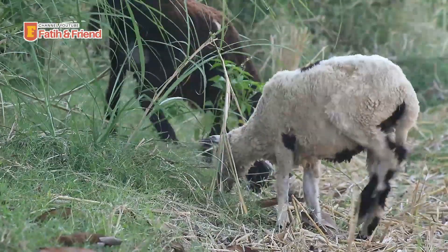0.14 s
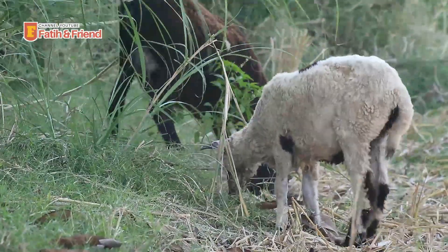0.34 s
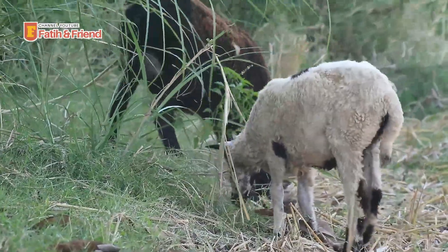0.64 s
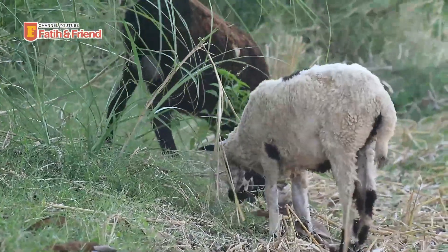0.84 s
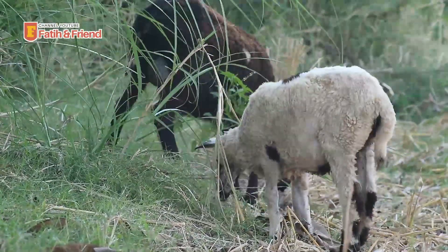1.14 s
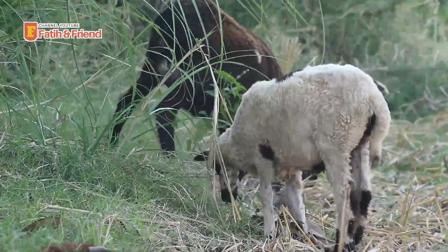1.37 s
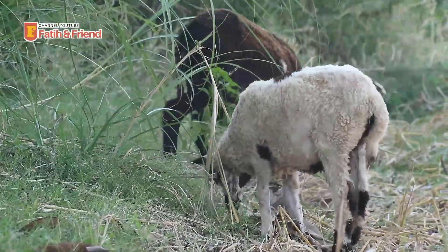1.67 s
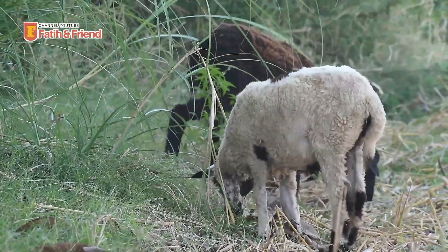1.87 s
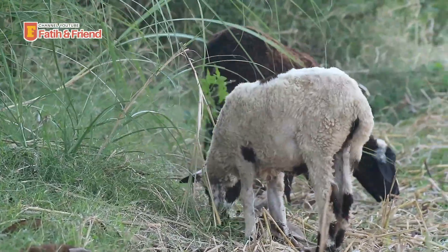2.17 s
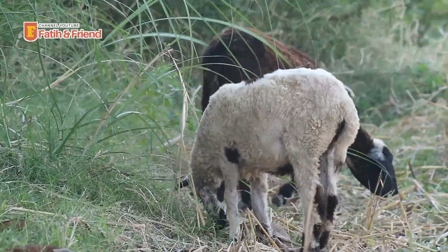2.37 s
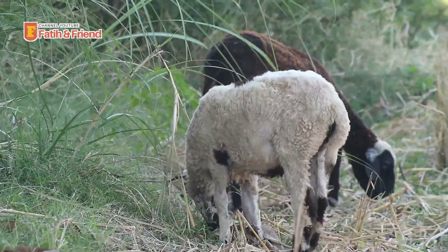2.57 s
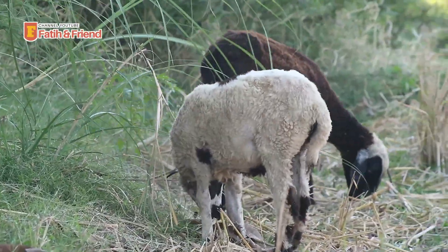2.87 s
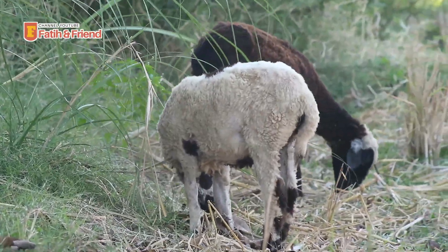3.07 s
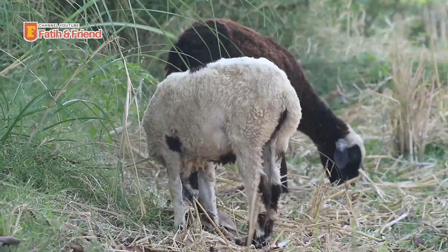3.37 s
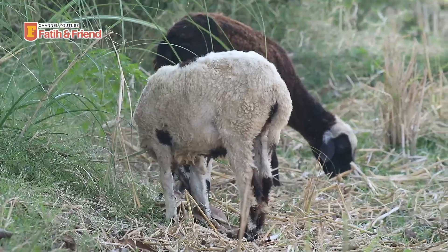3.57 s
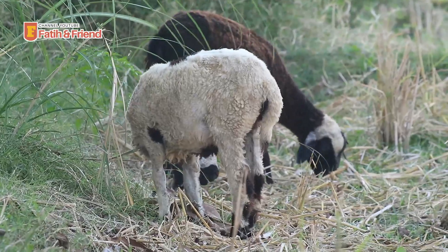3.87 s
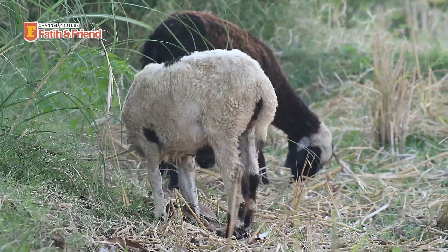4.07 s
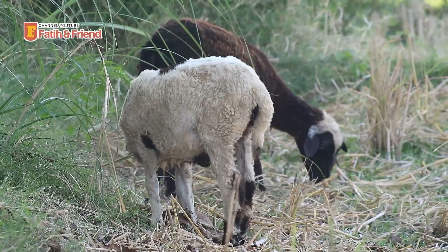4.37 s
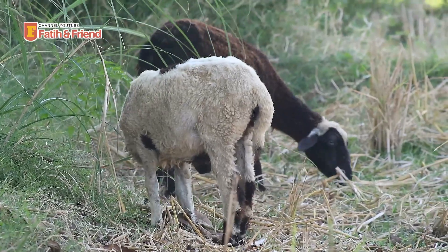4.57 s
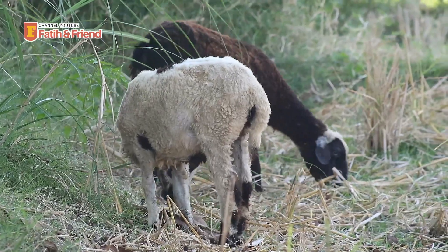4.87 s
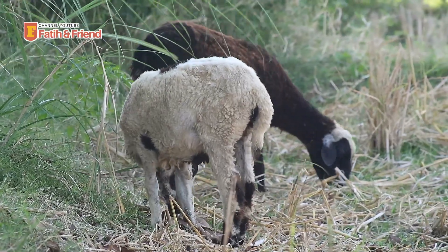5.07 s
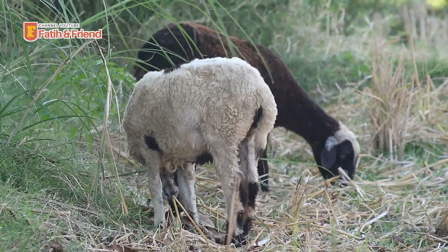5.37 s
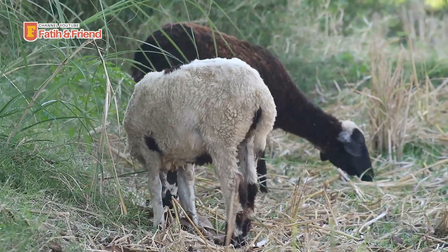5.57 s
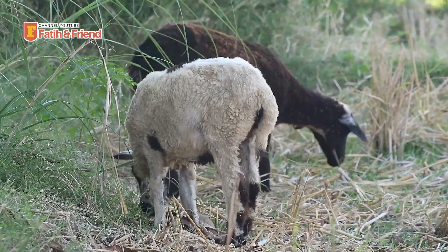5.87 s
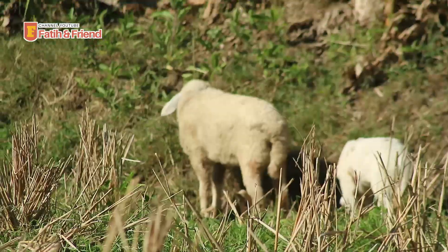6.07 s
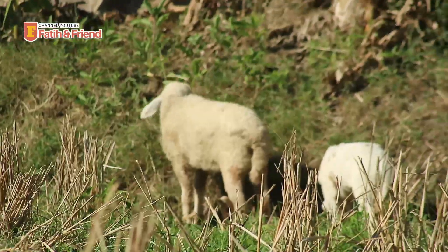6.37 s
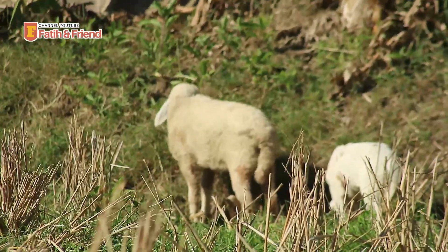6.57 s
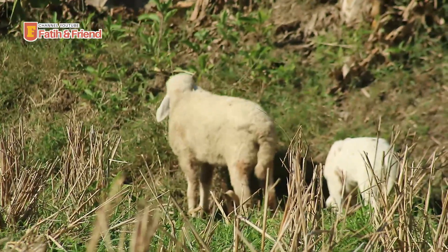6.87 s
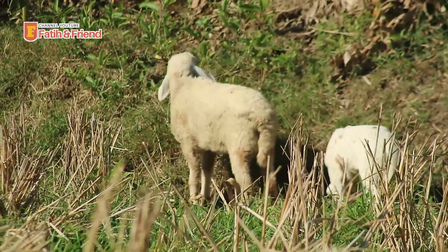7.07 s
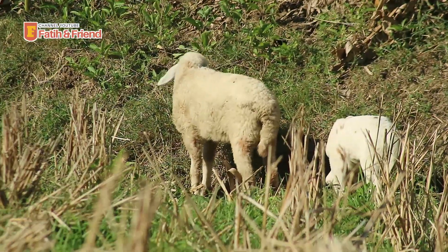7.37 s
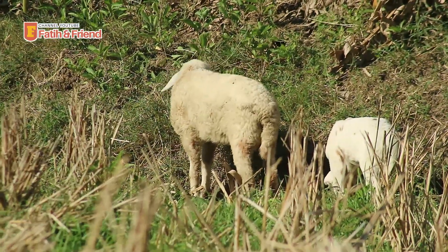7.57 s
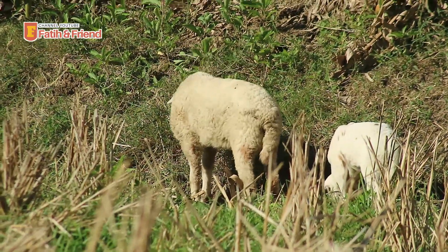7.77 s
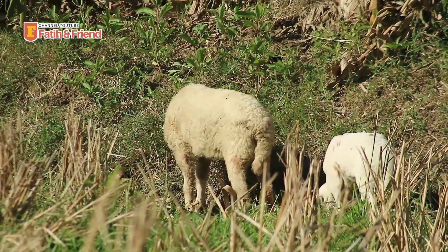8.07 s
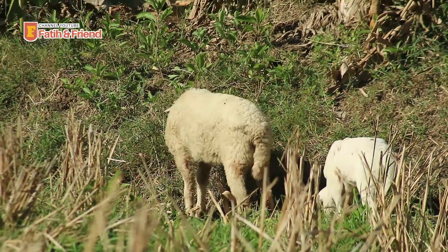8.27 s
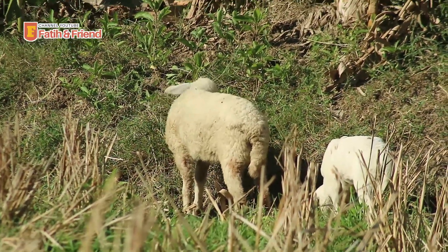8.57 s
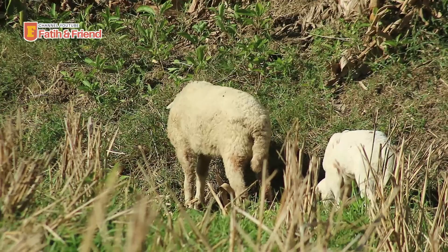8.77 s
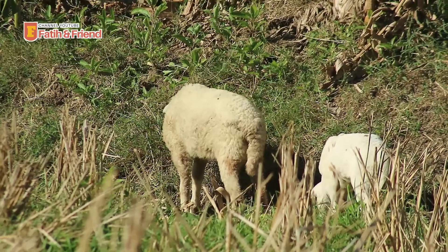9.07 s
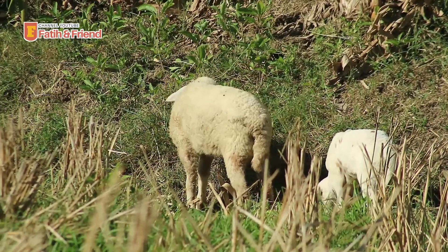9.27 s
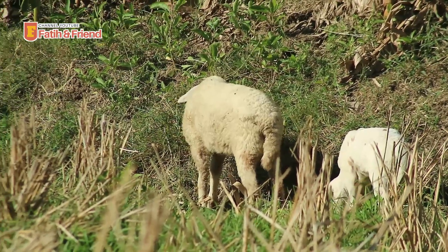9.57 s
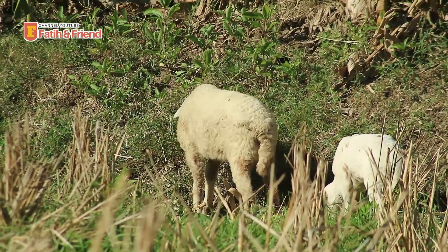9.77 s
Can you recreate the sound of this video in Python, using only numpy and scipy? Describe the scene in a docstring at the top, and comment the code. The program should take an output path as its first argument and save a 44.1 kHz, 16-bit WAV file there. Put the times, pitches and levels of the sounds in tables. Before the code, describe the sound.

Outdoor flock of lambs, mono and band-limited, with slight gritty hiss under each call. High nasal bleats scoop up, hold, then sag and tremble; they overlap at first, then a deep call and a raspy, strong one stand alone. The sound drops out briefly with clicks, two softer bleats overlap, another follows, and a final call begins.

```python
"""Lambs in an open field. Slow fold beats creak, then four arching bleats overlap in a run, each a train of
vocal-fold pulses and pulsed air, ragged at low pitch, clear at the top, coloured by a throat and mouth.
A deep bleat and the loudest follow; in the pause a coarse recorder mutes and returns with clicks. Then an
overlapping pair, a closing bleat, and the opening bleat again, cut off by the end. A ground bounce and a
short, dull scatter follow every call; the recorder's coarse steps add a faint hiss."""
import sys
import numpy as np
from scipy import signal
from scipy.fft import rfft, irfft, next_fast_len
from scipy.io import wavfile
from scipy.ndimage import uniform_filter1d

SR = 44100
rng = np.random.default_rng(int(sys.argv[2]) if len(sys.argv) > 2 else 0)


def file_out(sig):
    """Save sig as 16-bit WAV at sys.argv[1]."""
    # one column per channel
    cols = np.atleast_2d(sig).T
    # limit, then scale
    lim = np.clip(cols, -1, 1)
    pcm = np.round(lim * 32767).astype(np.int16)
    wavfile.write(sys.argv[1], SR, pcm)


N = 437913

# throat and mouth resonances per voice: f/Hz, level/dB
BRIGHT_THROAT = [(270, -23), (520, -17), (800, -9.5), (1100, -15), (1350, -13), (1600, -21), (2100, -9.5),
                 (2500, -22), (3000, -4), (3450, -9), (4100, -27), (4700, -26.5), (5600, -48), (7000, -35),
                 (9000, -84)]
# f/Hz, level/dB
STRONG_THROAT = [(280, -25), (600, -21), (880, -6), (1200, -21.5), (1500, -17), (1780, -2.5), (2100, -15),
                 (2500, -2), (3000, -16), (3600, -27.5), (4300, -26), (5300, -54), (6400, -45), (9000, -75)]
# f/Hz, level/dB
THIN_THROAT = [(260, -20.5), (520, -14), (800, -6), (1050, 5), (1400, -15), (1800, -18.5), (2200, -10),
               (2900, -7.5), (3400, -19.5), (4400, -26), (5500, -55), (9000, -71.5)]
# f/Hz, level/dB
HOLLOW_THROAT = [(260, -32.5), (520, -12.5), (760, -18.5), (1020, 0.5), (1300, -12.5), (1600, -16.5),
                 (2080, 2), (2450, -19), (3000, 1.5), (3500, -6.5), (3900, -24.5), (4500, -29), (5600, -45),
                 (9000, -72)]
# f/Hz, level/dB
DEEP_THROAT = [(180, -21), (380, -18), (730, -8), (920, 3.5), (1130, -15), (1550, -9), (1900, 3.5),
               (2100, -14), (2800, -7), (3500, -4), (4200, -26), (5000, -29.5), (6000, -47), (9000, -69.5)]
# f/Hz, level/dB
REEDY_THROAT = [(230, -29), (450, -14), (680, -6.5), (870, 2.5), (1200, -15), (1600, -11.5), (1950, 0),
                (2300, -7), (2900, -1.5), (3600, -6), (4400, -21.5), (5000, -31.5), (6500, -47),
                (9000, -69)]
# f/Hz, level/dB
NASAL_THROAT = [(230, -29), (470, -16.5), (700, -17.5), (930, -3), (1200, -18), (1600, -16.5), (1900, 0),
                (2350, -21), (2900, 0.5), (3300, -8), (3800, -21), (4900, -31), (6200, -54.5), (9000, -70)]
# throat behind a shut mouth: f/Hz, level/dB
SHUT_MOUTH = [(300, -9), (700, -3), (1300, 0), (2000, -8), (3000, -5), (4500, -11), (7000, -35)]
REPEAT_S = 9.0998


def flock():
    """Sum of all calls and creaks; the opening call returns after REPEAT_S."""
    calls = np.zeros(N)
    for delay_s in (0, REPEAT_S):
        calls += creak("opening", SHUT_MOUTH, delay_s)
        calls += bleat("opening", BRIGHT_THROAT, rough=.0018, rasp_db=-28, quaver=.0012, tremble=.004,
                       hum_db=5.5, closed=.019, release_s=.016, delay_s=delay_s)
    calls += bleat("answer", STRONG_THROAT, rough=.0026, rasp_db=-25, quaver=.0025, tremble=.005,
                   hum_db=17, closed=.0088, release_s=.011, squeeze_db=6)
    calls += bleat("joining", THIN_THROAT, rough=.0017, rasp_db=-19.5, quaver=.0055, tremble=.008,
                   hum_db=1, closed=.017, release_s=.007)
    calls += bleat("hollow", HOLLOW_THROAT, rough=.0033, rasp_db=-20, quaver=.007, tremble=.011,
                   hum_db=9, closed=.013, release_s=.018)
    calls += creak("deep", DEEP_THROAT)
    calls += bleat("deep", DEEP_THROAT, rough=.0019, rasp_db=-24, quaver=.0018, tremble=.003,
                   hum_db=1, closed=.009, release_s=.014)
    calls += creak("loudest", STRONG_THROAT)
    calls += bleat("loudest", STRONG_THROAT, rough=.0021, rasp_db=-27, quaver=.0025, tremble=.008,
                   hum_db=22.5, closed=.0075, release_s=.011, squeeze_db=9)
    calls += bleat("pair, first", REEDY_THROAT, rough=.0018, rasp_db=-21, quaver=.0035, tremble=.006,
                   hum_db=-3, closed=-.14, release_s=.015)
    calls += bleat("pair, second", REEDY_THROAT, rough=.0016, rasp_db=-27, quaver=.0045, tremble=.005,
                   hum_db=5, closed=.016, release_s=.018)
    calls += creak("closing", NASAL_THROAT)
    calls += bleat("closing", NASAL_THROAT, rough=.0016, rasp_db=-27, quaver=.0022, tremble=.004,
                   hum_db=-3.5, closed=.03, release_s=.009, squeeze_db=4)
    return calls


# one row per bleat: t/s, length/s, nominal top f/Hz, scoop/share, rise/s, sag/share, drop/share,
# nominal crest level/dB, crest after/s, swell/dB, fade/dB, brightness/dB, dulling/dB
BLEATS = {"opening": (.486, .924, 278.3, .222, .163, 0.15, 0.027, -23, .33, 10.5, 5.5, 6.5, 1),
          "answer": (1.19, 1.32, 299.1, .52, 0.152, 0.054, 0.08, -21.5, .25, 12, 8.5, 8, 6),
          "joining": (1.825, 1.092, 266.4, 0.19, 0.1, 0.094, 0.12, -25.8, .3, 3, 6.5, 13.5, 5),
          "hollow": (2.4, .92, 267.6, .366, .141, .078, 0.026, -30, .24, 3, 2, -4, 0),
          "deep": (3.578, .892, 190.7, .18, .19, 0.13, 0.048, -29, 0.41, 2.5, 3.5, 1, 3),
          "loudest": (4.48, 1.386, 303.5, 0.35, 0.14, 0.115, .03, -18, .46, 2, 16, 8.5, 13.5),
          "pair, first": (6.63, 1.02, 257.5, .275, .135, .232, 0.035, -33.5, .27, 7, 9.5, -.5, 4),
          "pair, second": (6.76, .9, 233, 0.26, 0.2, 0.09, .05, -30.5, 0.49, 7, 8, 7, 4),
          "closing": (7.762, 1.07, 242.5, .27, .115, .115, .15, -25, 0.44, 6, 4, 5.5, 0)}
SPLIT_HZ, EDGE_HZ, HUM_HZ = 1400, 3700, 350
RASP_JITTER, RASP_AIR_DB = .01, 9  # at harshness 1: period scatter share, extra air


def bleat(name, throat, rough, rasp_db, quaver, tremble, hum_db, closed, release_s, squeeze_db=0, delay_s=0):
    """One call: fold pulses and pulsed air ring a throat whose resonances shift at the onset."""
    row = BLEATS[name]
    start, length = row[:2]
    end = start + length
    first = int((start - .02 + delay_s) * SR)
    t = np.arange(first, (end + .15 + delay_s) * SR) / SR - delay_s
    n = len(t)
    hz, level_db, bright_db = gesture(name, row, t, tremble)
    after, before, age = np.maximum(t - end, 0), np.maximum(start - t, 0), t - t[0]

    hz = hz * np.exp(-3.5 * after)  # folds slacken as the air runs out
    slack = np.clip(1 - hz / hz.max(), 0, .3)
    harsh = harshness(name, t)
    ragged = rough * (1 + 8 * slack) + RASP_JITTER * harsh  # slack folds beat unevenly
    hz = hz * (1 + quaver * walk(n, 24) + ragged * walk(n, 420))
    phase = np.cumsum(hz) / SR % 1
    offset = (phase - .5) * SR / hz  # samples from the nearest closure
    pulses = np.sinc(offset / 2) * np.exp(-(offset / 10) ** 2)
    pulses = unit(pulses - uniform_filter1d(pulses, size=900))
    pulses *= undb(27 * ragged * walk(n, 300))

    puff = .37 + np.exp(-((phase - .5) % 1) / .2)  # air peaks at each closure
    air = unit(rng.standard_normal(n) * puff)
    stop_db = squeeze_db * np.exp(-((t - end + .028) / .031) ** 2)  # throat squeezes shut with a rasp
    air_db = rasp_db + 20 * slack + stop_db / 2 + RASP_AIR_DB * harsh
    source = pulses + undb(air_db) * air

    # a slower throat clock lowers all resonances; negative closed raises them
    tongue = .016 * walk(n, 10)  # small shifts of tongue and jaw
    clock = np.cumsum(1 - closed * np.exp(-age / .18) + tongue)
    ticks = np.arange(n)
    ringing = colour(np.interp(ticks, clock, source), throat)
    voice = np.interp(clock, ticks, ringing)

    body, upper = split(steady(voice), SPLIT_HZ)
    hum, vowel = split(body, HUM_HZ)
    middle, edge = split(upper, EDGE_HZ)
    nose_db = hum_db * (np.exp(-(age / .6) ** 2) - .5)  # from +hum_db/2 towards -hum_db/2
    effort_db = np.maximum(level_db - level_db.max(), -11)  # effort sharpens the edge
    edge_db = 5.5 + .7 * effort_db + 20 * slack + stop_db
    voice = (hum * undb(nose_db) + vowel) * undb(-bright_db) + middle + edge * undb(edge_db)
    voice *= undb(level_db + .5 * walk(n, 30))
    voice *= np.exp(-before / .004 - after / release_s)
    return np.pad(flare(name, t, voice), (first, N))[:N]


# voice breaks into a deep warble: bleat, t/s, length/s, pitch swing/share
WARBLES = [("pair, second", 7.22, .2, .025), ("closing", 8.603, .15, .009)]
WARBLE_HZ = 13.7
TREMBLE_HZ, TREMBLE_WANDER, TREMBLE_DB = 12, .25, .7  # mean rate, its spread as a share, swing at the end


def gesture(name, row, t, tremble):
    """Pitch, level, brightness: arch and push, lurches, warbles and a shake that grows as the lamb tires."""
    start, length, *shape = row
    age = np.clip(t - start, 0, length)
    level_db, bright_db = push(age, length, *shape[5:])
    pitch_step, level_step_db, bright_step_db = lurches(name, t)
    tremble_hz = TREMBLE_HZ * (1 + TREMBLE_WANDER * walk(len(t), 10))
    shake = age / length * np.sin(2 * np.pi * np.cumsum(tremble_hz) / SR)
    warble = np.zeros(len(t))
    for who, s, span, depth in WARBLES:
        if who == name:
            warble += depth * hold(t, s, span) * np.sin(2 * np.pi * WARBLE_HZ * (t - s))
    hz = arch(age, length, *shape[:5]) * (1 + pitch_step + warble + tremble * shake)
    return hz, level_db + level_step_db + TREMBLE_DB * shake, bright_db + bright_step_db


SCOOP_SHAPE, DROP_S = 1.4, .04


def arch(age, length, top_hz, scoop, rise_s, sag, drop):
    """Pitch scoops up as the folds tighten, sags as the air is used and drops at the end."""
    tighten = 1 - scoop * np.exp(-(age / rise_s) ** SCOOP_SHAPE)
    sagging = 1 - sag * (age / length) ** 2
    dropping = 1 - drop * np.exp((age - length) / DROP_S)
    return top_hz * tighten * sagging * dropping


CATCH_DB, CATCH_S = 11, .04  # folds start weak and catch
SPENT_DB, SPENT_S = 5, .025  # level gives way at the end
FADE_S = .38  # easing time constant after the crest
WAVER_DB, MOUTH_WAVER_DB, WAVER_PER_S = .6, 1.1, 16  # uneven push, uneven mouth opening


def push(age, length, crest_db, crest_s, swell_db, fade_db, bright_db, dulling_db):
    """Level and brightness (upper resonances over the lowest): swell to a crest, then fade and dull."""
    swelling = np.maximum(1 - age / crest_s, 0)
    easing = 1 - np.exp(-np.maximum(age - crest_s, 0) / FADE_S)
    ends_db = CATCH_DB * np.exp(-age / CATCH_S) + SPENT_DB * np.exp((age - length) / SPENT_S)
    level_db = crest_db - swell_db * swelling - fade_db * easing - ends_db
    level_db = level_db + WAVER_DB * walk(len(age), WAVER_PER_S)
    bright_db = bright_db - dulling_db * easing + MOUTH_WAVER_DB * walk(len(age), WAVER_PER_S)
    return level_db, bright_db


# voice lurches and holds: bleat, t/s, length/s, pitch step/share, level step/dB, brightness step/dB
LURCHES = [("opening", 1.01, .03, -.014, -1.5, 0), ("opening", 1.06, .12, .006, 1, 2),
           ("joining", 2.12, .07, .012, 3, 2), ("hollow", 2.6, .06, -.008, 0.5, -1),
           ("hollow", 3.16, .045, -.03, 0, 0), ("loudest", 4.49, .14, -.005, 1.3, 2),
           ("loudest", 4.95, .04, -.016, -3, -2), ("loudest", 5.13, .12, .003, 2, 2),
           ("loudest", 5.29, .085, .008, 0, 1), ("loudest", 5.39, .09, -.007, .5, 0),
           ("loudest", 5.53, .115, .011, 0, 0), ("loudest", 5.65, .11, -.022, .5, 0),
           ("loudest", 5.84, .05, -.04, 4.5, 2), ("pair, first", 6.635, .03, .03, 1, 0),
           ("pair, first", 6.67, .03, -.05, -2, 0), ("pair, first", 6.76, .2, .018, 0, 0),
           ("pair, first", 7.07, .26, -.03, 0, 0), ("pair, second", 7.505, .075, -.025, 1, 0),
           ("pair, second", 7.58, .08, -.04, -6, -8), ("closing", 7.82, .13, .004, 3, 1),
           ("closing", 7.97, .15, -.003, -2.5, -3), ("closing", 8.14, .15, 0, 2.8, 5),
           ("closing", 8.3, .26, .007, -1, 5)]


def lurches(name, t):
    """Summed brief steps of one bleat in pitch share, level dB and brightness dB."""
    steps = np.zeros((3, len(t)))
    for who, s, length, *step in LURCHES:
        if who == name:
            steps += np.outer(step, hold(t, s, length))
    return steps


# folds beat raggedly and leak air: bleat, t/s, length/s, harshness/0-1
RASPS = [("opening", .48, .08, .6), ("opening", 1.015, .04, .5), ("opening", 1.17, .05, .8),
         ("answer", 1.2, .21, .25), ("joining", 1.83, .14, .45), ("hollow", 2.47, .05, .9),
         ("hollow", 2.62, .28, .6), ("joining", 2.5, .35, .45), ("hollow", 3.29, .05, .9),
         ("deep", 3.57, .09, .5), ("loudest", 4.48, .16, .75), ("loudest", 5.835, .065, .9),
         ("pair, second", 6.76, .14, .8), ("pair, second", 7.25, .05, .4), ("pair, first", 7.23, .12, .6),
         ("closing", 7.76, .13, .55), ("closing", 7.89, .19, .15), ("closing", 8.8, .05, .4)]


def harshness(name, t):
    """Summed moments in which the folds of one bleat beat raggedly and leak air."""
    harsh = np.zeros(len(t))
    for who, s, span, amount in RASPS:
        if who == name:
            harsh += amount * hold(t, s, span)
    return harsh


# tongue and jaw sharpen or damp one resonance: bleat, t/s, length/s, centre f/Hz, width/Hz, gain/dB
FLARES = [("opening", .485, .11, 3600, 250, 5), ("opening", .485, .075, 2900, 400, -5),
          ("opening", .635, .06, 2050, 150, 10), ("opening", 1.17, .23, 3050, 350, -4),
          ("answer", 1.66, .75, 4150, 600, -9), ("joining", 1.825, .15, 2250, 160, 11),
          ("joining", 1.84, .14, 4200, 600, 6), ("hollow", 2.4, .24, 3250, 450, -5),
          ("hollow", 2.42, .42, 980, 70, 3), ("hollow", 2.92, .12, 2080, 150, 5),
          ("deep", 3.88, .25, 3450, 120, 4), ("deep", 3.57, .05, 3550, 250, 8),
          ("loudest", 4.76, .36, 2450, 600, 2), ("loudest", 5.02, .8, 4100, 600, -9),
          ("loudest", 4.96, .41, 3000, 200, -7), ("loudest", 5.375, .27, 3200, 250, 4),
          ("loudest", 5.83, .08, 3050, 550, 8), ("pair, first", 6.63, .13, 2600, 280, -11),
          ("pair, first", 6.64, .16, 3550, 400, 7), ("pair, first", 6.88, .13, 780, 90, 8),
          ("pair, second", 6.96, .08, 1920, 130, 10), ("pair, second", 7.05, .5, 3200, 230, -6),
          ("pair, second", 7.39, .18, 3570, 90, 6), ("pair, second", 7.58, .08, 790, 90, 12),
          ("closing", 7.82, .07, 4300, 450, 6), ("closing", 7.93, .23, 940, 120, 4),
          ("closing", 8.25, .08, 930, 200, -12), ("closing", 7.75, .085, 3300, 450, -8),
          ("closing", 8.4, .3, 2750, 150, 5), ("closing", 8.77, .08, 3450, 350, 5.5)]


def flare(name, t, voice):
    """Single resonances of one bleat stand out or sink for a moment, by adding a scaled band."""
    size = next_fast_len(len(t), real=True)
    spectrum, f = rfft(voice, size), np.arange(size // 2 + 1) * SR / size
    for who, s, length, hz, width, db in FLARES:
        if who == name:
            band = irfft(spectrum * np.exp(-((f - hz) / width) ** 4), size)[:len(t)]
            voice = voice + (undb(db * hold(t, s, length)) - 1) * band
    return voice


# single slow fold beats as a bleat catches: bleat, t/s, peak level/dB
CREAKS = [("opening", .368, -41), ("opening", .383, -43), ("opening", .395, -41), ("opening", .408, -40),
          ("opening", .42, -40), ("opening", .433, -41), ("opening", .447, -40), ("opening", .465, -44),
          ("opening", .476, -43), ("closing", 7.735, -43), ("deep", 3.551, -43), ("deep", 3.566, -41),
          ("deep", 3.58, -23), ("loudest", 4.393, -33), ("loudest", 4.409, -28), ("loudest", 4.42, -26),
          ("loudest", 4.431, -25), ("loudest", 4.446, -17), ("loudest", 4.457, -18),
          ("loudest", 4.469, -20)]


def creak(name, throat, delay_s=0):
    """Lone fold beats, each an impulse with a short puff, ring mainly the upper throat."""
    t = np.arange(SR // 20) / SR
    puff = .14 * rng.standard_normal(len(t)) * np.exp(-t / .011)
    beats = [(s, db) for who, s, db in CREAKS if who == name]
    body, upper = split(colour(signal.unit_impulse(len(t)) + puff, throat), SPLIT_HZ)
    return taps(beats, body / 2 + upper, delay_s)


SMEAR_S, SMEAR_SHARE = .0008, .35  # approximate echo spacing, strength


def smear(x):
    """All-pass echoes spread each pulse without colouring it."""
    feedback = np.zeros(int(SMEAR_S * SR))
    feedback[0], feedback[-1] = 1, SMEAR_SHARE
    return signal.lfilter(feedback[::-1], feedback, x)


def field(x, t60_s, wet_db):
    """Weak scatter from the ground and the banks: convolution with a decaying noise tail."""
    t = np.arange(SR // 2) / SR
    tail = colour(rng.standard_normal(len(t)), [(200, 0), (2000, 3.5), (6000, -7.5)])
    tail *= np.exp(-np.log(1000) * t / t60_s) * (t > .008)
    return undb(wet_db) * signal.fftconvolve(x, tail / np.linalg.norm(tail))[:N]


def undb(db):
    """Decibels to gain."""
    return 10 ** (np.asarray(db) / 20)


def unit(x):
    """Scale to rms 1."""
    return x / np.sqrt(np.mean(x ** 2))


def walk(n, rate):
    """Smooth random signal of rms about 1 that changes about rate times a second."""
    k = max(int(SR / rate), 1)
    noise = rng.standard_normal(n + 4 * k)
    smooth = uniform_filter1d(uniform_filter1d(noise, k), k)
    return unit(smooth[2 * k:2 * k + n])


def hold(t, s, length, edge_s=.008):
    """1 from s for the given length, with quick smooth edges."""
    return (np.tanh((t - s) / edge_s) - np.tanh((t - s - length) / edge_s)) / 2


def colour(x, points):
    """Causal minimum-phase filter through (Hz, dB) points: resonances ring after each pulse."""
    size = 4096
    hz, db = np.transpose(points)
    f = np.maximum(np.arange(size // 2 + 1) * SR / size, 1)
    skirt = 1 / np.sqrt(1 + (hz[0] / 2 / f) ** 4)  # low cut below the first point
    gain = skirt * undb(np.interp(np.log(f), np.log(hz), db))
    cepstrum = irfft(np.log(gain))
    cepstrum[1:size // 2] *= 2
    cepstrum[size // 2 + 1:] = 0
    return signal.fftconvolve(x, irfft(np.exp(rfft(cepstrum))))[:len(x)]


def split(x, hz):
    """The parts of x below and above hz."""
    low = signal.sosfiltfilt(signal.butter(N=6, Wn=hz, fs=SR, output="sos"), x)
    return low, x - low


def steady(x, size=1300):
    """Hold the short-time rms near 1."""
    power = uniform_filter1d(uniform_filter1d(x ** 2, size), size)
    return x / np.sqrt(power + 1e-12)


def taps(rows, shape, delay_s=0):
    """One copy of the given shape at each (s, peak dB)."""
    out = np.zeros(N + len(shape))
    for s, db in rows:
        first = int((s + delay_s) * SR)
        out[first:first + len(shape)] += undb(db) * shape / np.abs(shape).max()
    return out[:N]


def scene():
    """The flock, a bounce off the ground and the scatter, in one channel."""
    calls, ticks, ground_s = smear(flock()), np.arange(N), .0016
    calls = calls + undb(-16.5) * np.interp(ticks - ground_s * SR, ticks, calls)
    return (calls + field(calls, t60_s=.51, wet_db=-15.5))[None]


# recorder response: f/Hz, level/dB
ROLL_OFF = [(30, 7), (4500, 1.5), (6200, -8), (7000, -20), (8500, -28.5), (11000, -62), (15000, -66)]
TICK_S, TICK_DB = 4.92, -20  # small tick in the loudest bleat; peak before the roll-off
OFFSET_DB = -33.2  # steady offset of the zero line
MUTE_FROM_S, MUTE_TO_S = 6.2004, 6.5895
TOP_HZ = 15700


def record(dry):
    """Coarse recorder: steps hiss under calls and crackle in tails; the offset clicks at each mute edge."""
    step, stride = 1 / 128, 3  # amplitude step; one sample kept in three
    t = np.arange(N) / SR
    coarse = np.zeros(N)
    coarse[::stride] = stride * step * np.round(dry[0, ::stride] / step)
    tick = taps([(TICK_S, TICK_DB)], np.ones(stride))
    out = colour(coarse + tick, ROLL_OFF)
    live = (t < MUTE_FROM_S) | (t > MUTE_TO_S)
    out = (out + undb(OFFSET_DB)) * live
    return signal.sosfiltfilt(signal.ellip(8, .1, 70, TOP_HZ, fs=SR, output="sos"), out)[None]


dry = scene()
out = record(dry)
file_out(out)
```